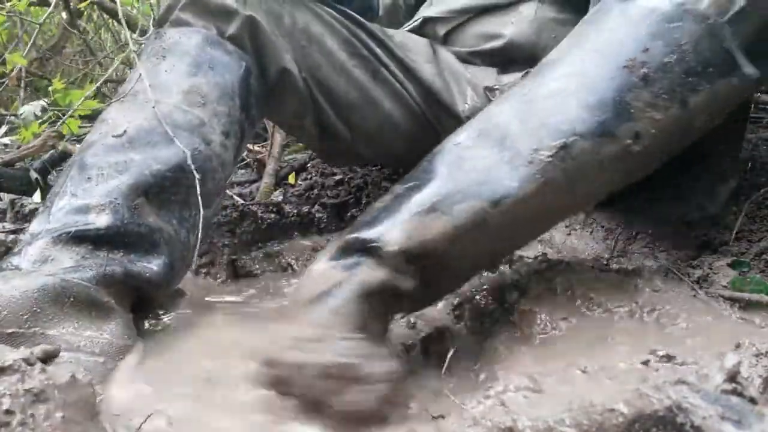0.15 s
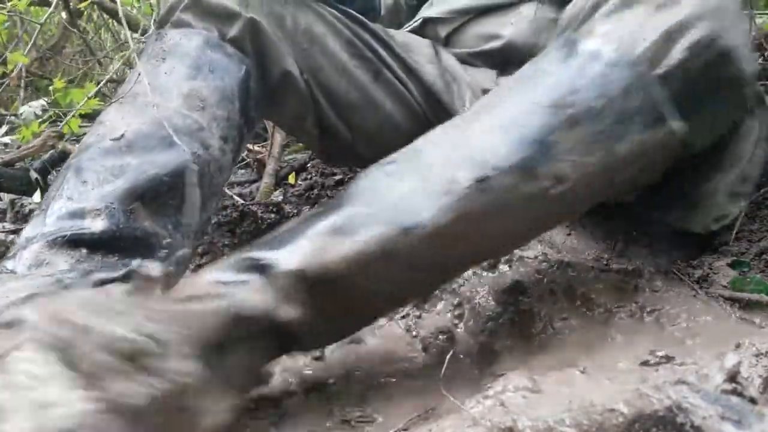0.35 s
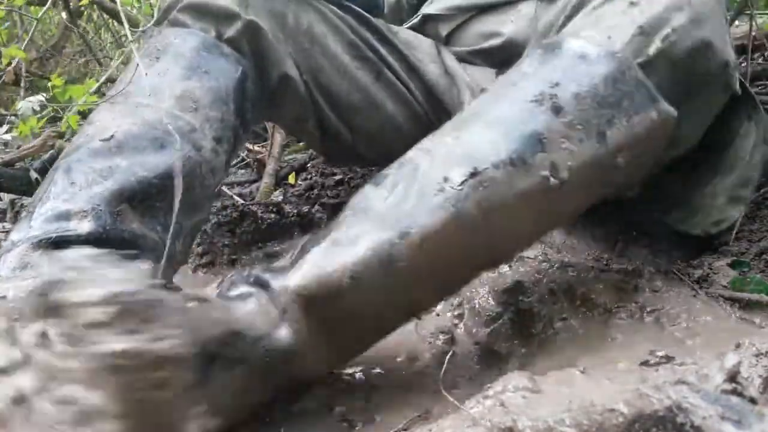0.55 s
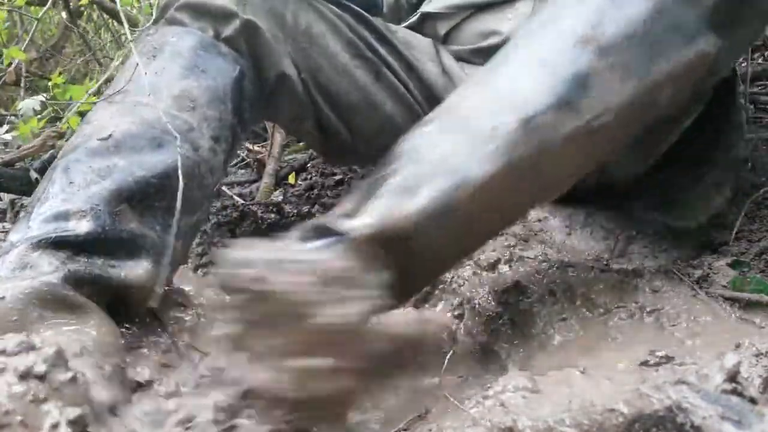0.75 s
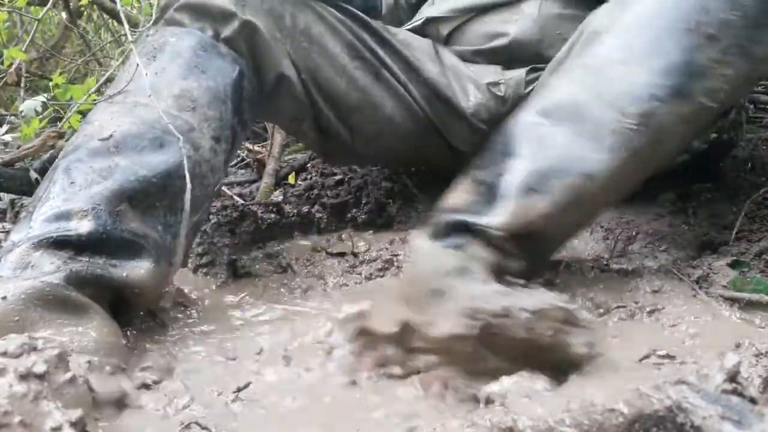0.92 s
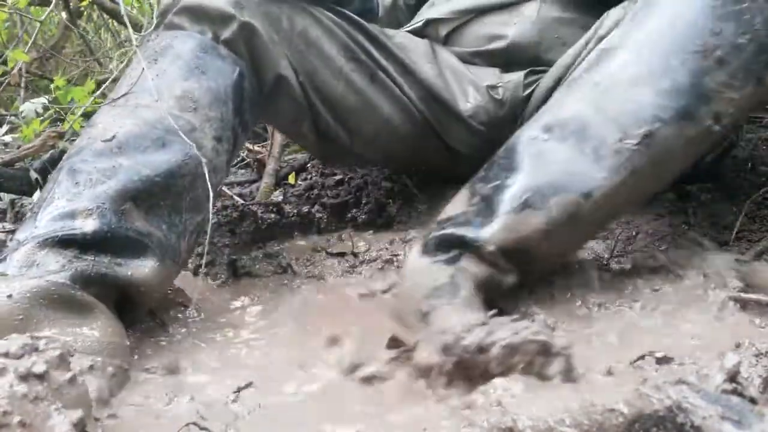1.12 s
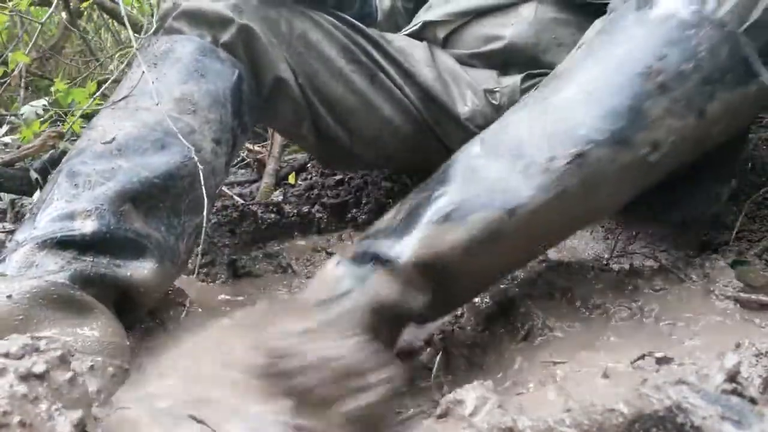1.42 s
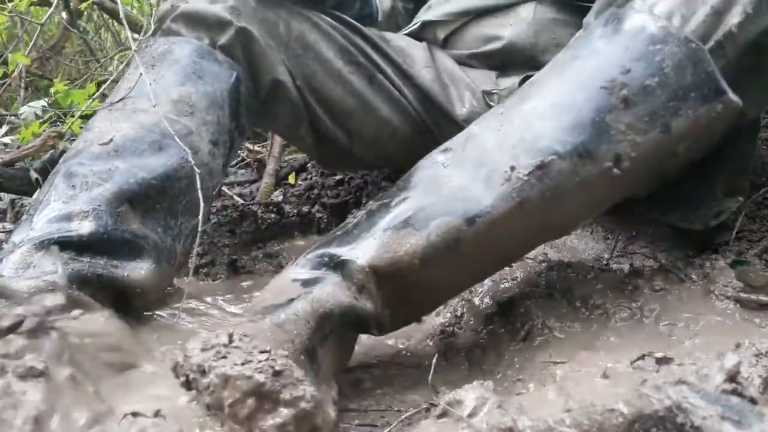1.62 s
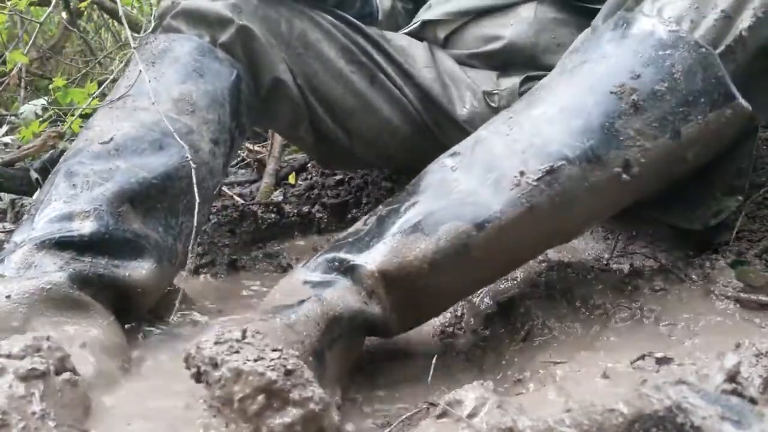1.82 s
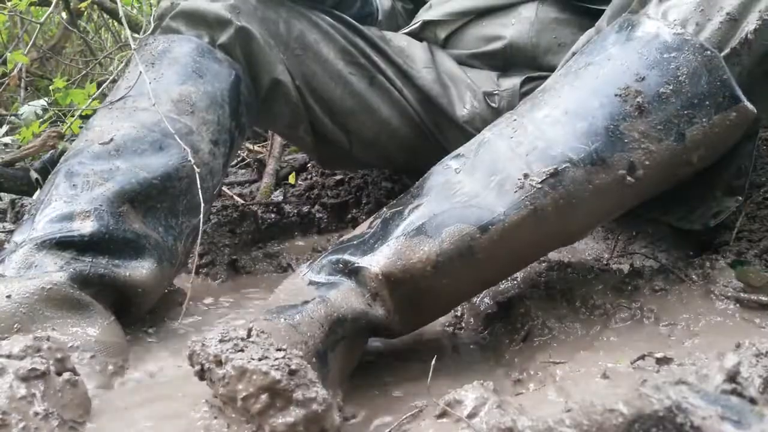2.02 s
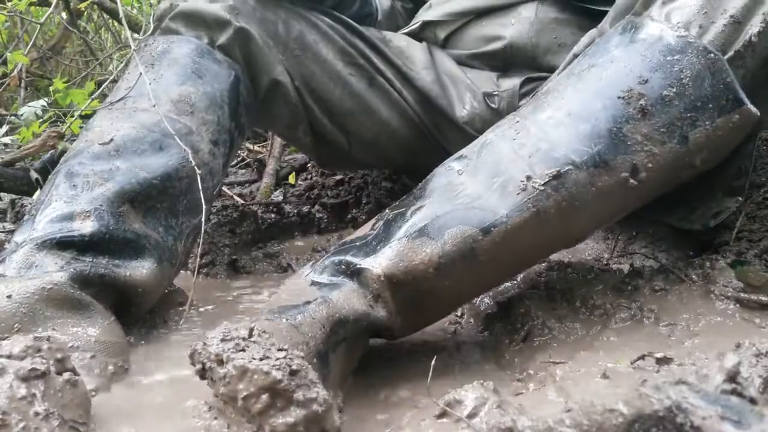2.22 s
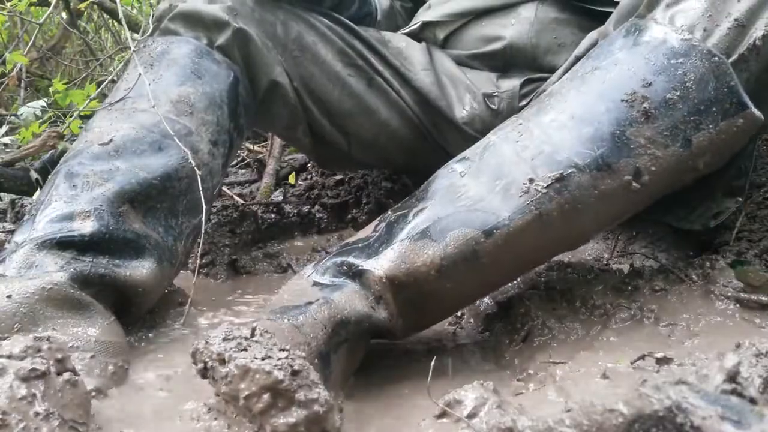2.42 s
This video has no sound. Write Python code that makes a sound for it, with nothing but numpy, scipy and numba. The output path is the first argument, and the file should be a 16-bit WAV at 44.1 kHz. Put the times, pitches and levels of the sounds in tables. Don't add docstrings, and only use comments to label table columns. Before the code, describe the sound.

A rubber boot sloshes through a mud puddle, heard very close outdoors. Soft wet movement begins at once, swelling from 0.3 s into squelches, bubble pops, gurgles, dull slaps and bright ticking spray, densest at 0.55-0.7 and around 1.0 s. It thins, with a sharp pop near 1.2, then a smaller squelchy burst at 1.45-1.8. Faint low woodland air remains; a hard, deep thump hits the right side at 2.1.

```python
import sys
import numpy as np
from scipy import signal
from scipy.fft import rfft, irfft
from scipy.io import wavfile
from scipy.ndimage import uniform_filter1d
from numba import njit

SR = 44100
rng = np.random.default_rng(int(sys.argv[2]) if len(sys.argv) > 2 else 0)


def master_out(mix):
    frames = np.transpose(np.atleast_2d(mix))
    ceiling = np.clip(frames, -1, 1)
    pcm = np.round(ceiling * 32767).astype(np.int16)
    wavfile.write(sys.argv[1], SR, pcm)


def voltage_ratio(level):
    return 10 ** (np.asarray(level, float) / 20)


N = 112454
TIME = np.arange(N) / SR

POP_CYCLES = 2.6
POP_RISE = 0.45


def colour(x, table, resonance=None):
    size = 4096
    f = np.arange(size // 2 + 1) * SR / size + 1
    hz, db = np.array(table).T
    gain_db = np.interp(np.log(f), np.log(hz), db)
    if resonance:
        centre, width, peak_db = resonance
        bump = (voltage_ratio(peak_db) ** 2 - 1) / (1 + (2 * (f - centre) / width) ** 2)
        gain_db = gain_db + 10 * np.log10(1 + bump)
    cepstrum = irfft(np.log(voltage_ratio(gain_db)))
    cepstrum[1:size // 2] *= 2
    cepstrum[size // 2 + 1:] = 0
    response = irfft(np.exp(rfft(cepstrum)))[None, :size // 2]
    return signal.fftconvolve(x, response, axes=1)[:, :N]


def unit(x):
    return x / np.sqrt(np.mean(x ** 2))


def walk(rate):
    hold = int(SR / rate)
    steps = np.repeat(rng.standard_normal(N // hold + 1), hold)
    return uniform_filter1d(steps, hold)[:N]


def pair(alike_hz):
    noise = rng.standard_normal((3, N))
    low = signal.lfilter(*signal.butter(1, alike_hz, fs=SR), noise[0])
    high = signal.lfilter(*signal.butter(1, alike_hz, "high", fs=SR), noise[1:])
    return low + high


@njit
def ring(n, sr, start, size, hz, length, glide, rise, blunt):
    y = np.zeros(n)
    for k in range(len(start)):
        first = int(start[k] * sr) + 1
        last = first + int(length[k] * sr * 6 ** (1 / blunt)) + 1
        for i in range(max(first, 0), min(n, last)):
            t = i / sr - start[k]
            u = t / length[k]
            cycles = hz[k] * (t + .23 * glide[k] * t * u * u)
            swell = (1 - np.exp(-t * hz[k] / rise)) * np.exp(-u ** blunt)
            y[i] += size[k] * swell * np.sin(2 * np.pi * cycles)
    return y


def grains(s, db, hz, length_s, glide, rise=0.15, blunt=1.24, aside=1):
    lag_ms, lag_spread_ms, pan_spread_db = 0.16, 0.08, 1.8
    place = rng.standard_normal((len(s), 2)).T
    lag = aside * (lag_ms + lag_spread_ms * place[0]) / 1000
    pan = pan_spread_db * place[1] / 2
    one = np.ones(len(s))
    hz = np.clip(hz, 20, SR / 2.5)
    ports = []
    for lag_share, pan_share in ((1, 1), (0.011, -1.1)):
        size = voltage_ratio(db + pan_share * pan)
        ports.append(ring(N, 1. * SR, s + lag_share * lag, size, hz * one,
                          length_s * one, glide * one, rise, blunt))
    return np.array(ports)


def wood_air():
    # (pitch [Hz], level [dB per Hz])
    wood_curve = [(25, 8), (60, 11.5), (150, -6.5), (400, -8), (1200, -16.5), (3000, -27), (8000, -23.5),
                  (15000, -40)]
    return voltage_ratio(-58.5 + 1.25 * walk(5.97)) * unit(colour(pair(600), wood_curve))


def stir(column):
    # (start [s], length [ms], spray level [dB], slurry level [dB])
    surges = [(-.05, 210, -62, -58), (0.089, 180, -69, -55), (0.186, 148, -48.5, -44),
              (0.308, 260, -41.5, -42), (0.488, 310, -53, -48.5), (0.582, 80, -34, -37.5),
              (.67, 245, -45, -44.5), (0.803, 45.6, -35, -42), (0.897, 110, -46.5, -44.5),
              (0.953, 120, -32.5, -36), (1.005, 17.3, -30.5, -24), (1.07, 88, -43, -46.5),
              (1.148, 147, -45, -53.5), (1.28, 290, -56.5, -55), (1.437, 74, -45.5, -48),
              (1.499, 120, -53, -56.5), (1.573, 188, -47, -53), (1.768, 230, -58, -63),
              (2.47, 81, -63, -67)]
    rise, drain, roundness = 0.21, 1.66, 2.12
    rows = np.array(surges)
    u = np.maximum(TIME - rows[:, :1], 0) / (rows[:, 1:2] / 1000)
    swell = np.sin(np.pi / 2 * np.minimum(u / rise, 1))
    fall = np.exp(-drain * np.maximum(u - rise, 0) ** roundness)
    power = (voltage_ratio(rows[:, column, None]) * swell * fall) ** 2
    return 10 * np.log10(np.sum(power, axis=0) + 1e-10)


def swarm(level_db, count, low_hz, high_hz, cycles, glide, scatter_db, gain_db):
    u = rng.random((count, 4)).T
    s = u[0] * (N - 1) / SR
    hz = low_hz * (high_hz / low_hz) ** u[1]
    scatter = -scatter_db * np.log(np.maximum(u[2], .07))
    db = level_db[(s * SR).astype(int)] + gain_db + scatter
    return grains(s, db, hz, cycles * (.5 + u[3]) / hz, glide, rise=0.7)


def slosh():
    # (time [s], level [dB])
    heave_levels = [
        (0, -54),
        (.4, -51),
        (1.5, -53.5),
        (1.9, -54),
        (2.199, -63),
        (2.55, -59.5),
    ]
    # (pitch [Hz], level [dB per Hz])
    spray_curve = [(800, -21), (2000, 1.5), (4000, 1), (8000, -0.5), (15000, -4.5)]
    slurry_curve = [(100, -31), (250, -14.5), (700, 3.1), (1300, -2.5), (2200, -22), (5000, -36.5)]
    heave_curve = [(25, -20), (60, 4.5), (120, -0.5), (250, -10.5), (500, -32)]
    spray_db = stir(column=2)
    slurry_db = stir(column=3)
    heave_db = np.interp(TIME, *np.array(heave_levels).T)

    spray_flicker = 4 * walk(350) + 1.5 * walk(60)
    out = unit(colour(pair(900.), spray_curve)) * voltage_ratio(spray_db - 8 + spray_flicker)
    out = out + unit(colour(pair(800.), slurry_curve)) * voltage_ratio(slurry_db - 9 + 4 * walk(90))
    heave_size = voltage_ratio(heave_db + 2.5 * walk(15)) + voltage_ratio(slurry_db - 15)
    out = out + unit(colour(pair(500.), heave_curve)) * heave_size
    out = out + swarm(spray_db, count=3500, low_hz=3400., high_hz=15000., cycles=2.5,
                      glide=.05, scatter_db=5, gain_db=-5)
    return out + swarm(slurry_db, count=1500, low_hz=380., high_hz=2600., cycles=1.9,
                       glide=.12, scatter_db=4.5, gain_db=-3.5)


def fade(x, ms):
    return signal.lfilter([1], [1, -np.exp(-1000 / (ms * SR))], x)


def ticks():
    # (time [s], peak level [dB], fizz above the ring [dB], pitch [Hz])
    tick_events = [(0.017, -35.5, -8.5, 6660), (0.047, -40, -17, 5000), (0.086, -40.5, -13, 4900),
                   (0.1416, -29.5, -2.5, 3760), (0.2518, -39.5, 0, 5000), (0.2967, -27, -2.5, 5000),
                   (0.3438, -20, -14.5, 4500), (0.3729, -23.5, -0.5, 4760), (0.387, -27, -10, 5100),
                   (0.404, -36.5, 9, 4740), (0.4386, -41, 8.5, 5100), (0.509, -21.5, -11, 4600),
                   (.5362, -40.5, 8, 5000), (0.5686, -21.5, -13, 4850), (0.5731, -9.5, -18.5, 4330),
                   (0.6044, -13, -15, 4780), (0.6205, -12.5, -8.5, 4330), (.637, -27.5, -6, 4970),
                   (0.6542, -26, -5.5, 4740), (0.6774, -22, -6.5, 5200), (0.7178, -22, -11, 5160),
                   (0.741, -24.5, -16, 4900), (0.8295, -22.5, -19, 5170), (0.8197, -23.5, -5, 4800),
                   (0.8467, -21, -12, 4300), (0.93, -21.5, -17, 4860), (0.9334, -17, -31, 4740),
                   (0.954, -21, -9.5, 4800), (0.9629, -12.5, -16, 4230), (1.0012, -21.5, -10, 5400),
                   (1.0253, -24, -8, 5170), (1.0412, -21, -14, 4800), (1.085, -30, 2, 4800),
                   (1.0981, -23, -3, 4700), (1.1305, -21, -19, 4730), (1.1356, -26, -14.5, 4100),
                   (1.2214, -28, -2.5, 3970), (1.2412, -25, -9, 4900), (1.263, -28, -30, 5400),
                   (1.461, -32.5, -10, 4170), (1.5710, -22.5, -10.5, 5350), (1.6010, -29, -3, 4870),
                   (1.62, -25, -5, 4800), (1.6295, -35, -11, 5200), (1.6400, -22, -10, 5200),
                   (1.6472, -13.5, -15.5, 5000), (1.656, -32, -25, 4900), (1.6680, -23.5, -19, 5100),
                   (1.6700, -21, -21, 5300), (1.7802, -19, -12, 4850)]
    fizz_ms, drizzle_ms = 0.78, 11.2
    s, db, fizz_db, hz = np.array(tick_events).T
    kicks = np.zeros(N)
    kicks[(s * SR).astype(int)] = voltage_ratio(db + fizz_db + 4)
    fizz = fade(fade(kicks, fizz_ms / 2), fizz_ms / 2) * 2000 / (fizz_ms * SR)
    drizzle = voltage_ratio(-18.5 + 6.3 * walk(600)) * fade(kicks, drizzle_ms)
    hiss = signal.lfilter(*signal.butter(1, 1800., "high", fs=SR), rng.standard_normal((2, N)))
    bubbles = grains(s, db - 8, hz, 0.96 / 1000, 0.026, rise=0.94, blunt=1.3)
    return bubbles + (fizz + drizzle) * hiss


def slaps():
    # (time [s], peak level [dB], pitch [Hz])
    slap_events = [(0.089, -39, 340), (.250, -30.5, 400), (.320, -36.5, 300), (0.388, -29, 480),
                   (0.4316, -30, 425), (.436, -28, 354), (0.4595, -20.5, 164), (0.501, -29, 497),
                   (0.6766, -25, 380), (0.6892, -21.5, 322), (1.0053, -39, 423), (1.012, -27.5, 253),
                   (1.47, -38, 130), (1.480, -42, 139), (1.4899, -32, 408), (1.506, -40, 377),
                   (1.521, -40.5, 200), (1.542, -36.5, 516), (1.647, -27, 420)]
    s, db, hz = np.array(slap_events).T
    return grains(s, db + 3.5, hz, 0.64 / hz, -0.016, rise=0.29, blunt=1.13)


def front_pops():
    # (time [s], peak level [dB], pitch [Hz])
    front_events = [
        (.1885, -39.5, 2200),
        (1.186, -21, 3260),
    ]
    s, db, hz = np.array(front_events).T
    return grains(s, db, hz, POP_CYCLES / hz, 0.06, rise=POP_RISE, aside=0)


def pops():
    # (time [s], peak level [dB], pitch [Hz])
    pop_events = [(0.235, -34, 640), (0.306, -30.5, 1230), (.201, -39, 646), (.286, -39, 600),
                  (.315, -49, 1420), (.362, -38, 1090), (.406, -45, 1880), (.544, -44, 503),
                  (.561, -37, 860), (.637, -32, 2840), (.727, -40.5, 860), (.769, -39, 1300),
                  (.882, -42, 576), (1.038, -32.5, 1330), (1.043, -38, 950), (1.078, -36, 960),
                  (1.602, -36.5, 2830), (1.692, -48, 2130), (0.43, -32.5, 680), (0.5, -34.5, 1130),
                  (0.567, -29.5, 850), (0.598, -22, 662), (0.6762, -31, 770), (0.818, -30.5, 1310),
                  (0.863, -39.5, 516), (0.964, -29, 1030), (1.1345, -37.5, 724), (1.181, -36.5, 1840),
                  (1.73, -37, 940), (1.78, -34.5, 1023), (.3183, -23, 9970), (.577, -20.5, 9200),
                  (1.617, -26, 2790), (1.6782, -32, 4550), (.819, -31, 650), (.8195, -31, 3340),
                  (.805, -36.5, 1500)]
    glide = 0.06
    s, db, hz = np.array(pop_events).T
    ms = POP_CYCLES * (1000 / hz) ** 0.6
    s = s + 0.0011
    main = grains(s, db + 5.5, hz, ms / 1000, glide, rise=POP_RISE)
    overtone = grains(s, db - 3, hz * 2.78, ms / 4000, glide)
    return main + overtone


def gurgles():
    # (time [s], peak level [dB], pitch [Hz], length [ms], glide [pitch grows by about 0.69 x this share by the
    gurgle_events = [(.296, -31, 934, 6.5, 0.16), (0.3741, -17.5, 1043, 3.46, -0.04),
                     (0.6896, -12, 1197, 2.5, -0.033), (.692, -32, 1277, 8.3, -0.0094),
                     (.910, -43, 715, 17, -0.025), (1.0099, -29, 740, 3.1, 0.2),
                     (1.0121, -20, 1125, 2.8, 0.16), (1.0160, -23, 845, 2, .1), (.6895, -23, 2500, 1, 0.21),
                     (1.68, -34, 4250, 3.4, .02), (0.445, -31, 1335, 4.9, 0.0077),
                     (0.505, -41, 1230, 4.9, 0.094), (0.575, -31, 1188, 12, 0.3),
                     (0.62, -33.5, 523, 15, 0.05), (1.02, -39, 715, 35, 0.3),
                     (1.2272, -25, 852, 22.6, 0.48), (1.228, -31, 2010, 3, -0.05),
                     (1.4610, -31, 1520, 1.64, -0.07), (1.5765, -26.5, 1240, 2.2, 0.9),
                     (1.6480, -25.5, 2870, 0.7, -0.34), (1.314, -47, 1280, 8.1, -0.02),
                     (1.5858, -29.5, 1050, 12.3, -0.0018), (1.6146, -17.5, 953, 2.74, -0.054),
                     (1.620, -22, 807, 6.8, -0.14), (1.627, -28, 784, 6, 0.22)]
    s, db, hz, ms, glide = np.array(gurgle_events).T
    return grains(s, db, hz, ms / 1000, glide, rise=.4, blunt=2.3) * voltage_ratio(2.5 * walk(400))


def landing_drop():
    start_s, level_db, swing_hz = 2.08922, -1.7, 71
    damping, undershoot = 1.02, 1.2
    angle = np.maximum(TIME - start_s, 0) * 2 * np.pi * swing_hz
    swing = np.cos(angle) - undershoot * np.sin(angle)
    step = (angle > 0) * voltage_ratio(level_db) * np.exp(-damping * angle) * swing
    return np.array([0 * step, step])


def scene():
    # (pitch [Hz], level [dB])
    left_curve = [(60, -7), (300, 2), (800, -4), (2400, 6), (7000, 2.5), (10500, -0.5), (14000, 7.5)]
    right_curve = [(60, -2), (300, 6.5), (1000, 5.5), (1800, 7), (4500, 4.5), (7500, -4.5), (14000, 7.5)]
    left_resonance = (4893, 935, 13.96)
    right_resonance = (9460, 2300, 10.13)
    air = wood_air() + slosh() + ticks() + slaps() + front_pops() + pops() + gurgles()
    left = colour(air[:1], left_curve, left_resonance)
    right = colour(air[1:], right_curve, right_resonance)
    return np.vstack([left, right]) + landing_drop()


def top_cut(x):
    return signal.sosfilt(signal.butter(12, 15890, fs=SR, output="sos"), x)


def record(dry):
    low_pass = signal.cheby1(7, .3, 14360, fs=SR, output="sos")
    mix = signal.sosfiltfilt(low_pass, dry)
    return top_cut(mix)


dry = scene()
out = record(dry)
master_out(out)
```